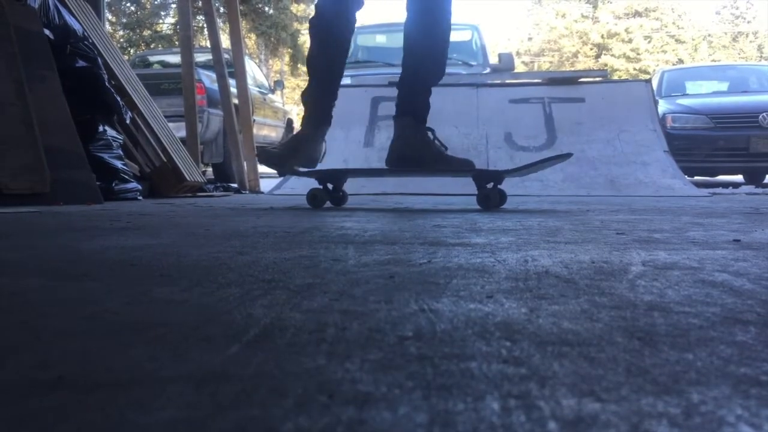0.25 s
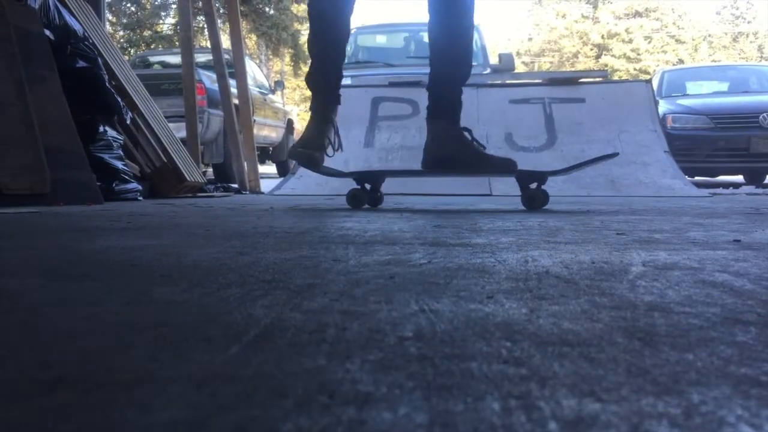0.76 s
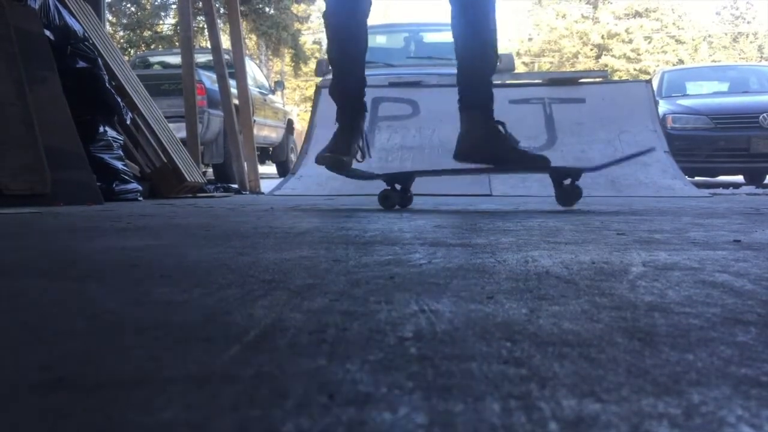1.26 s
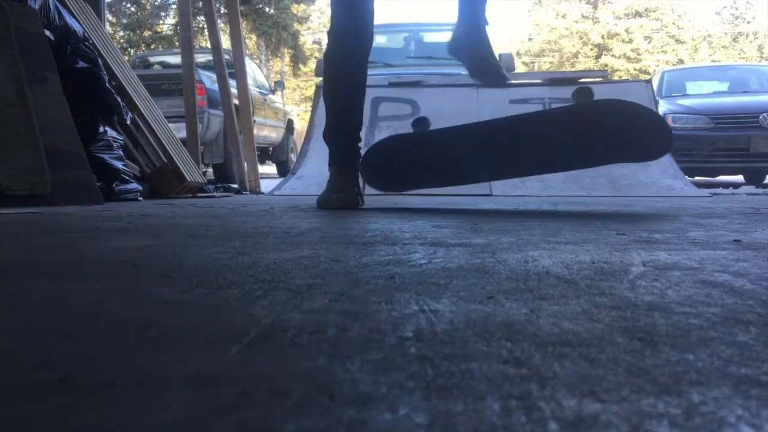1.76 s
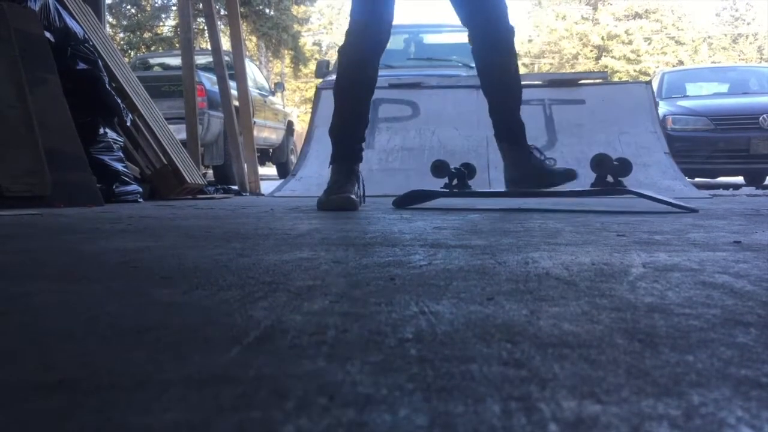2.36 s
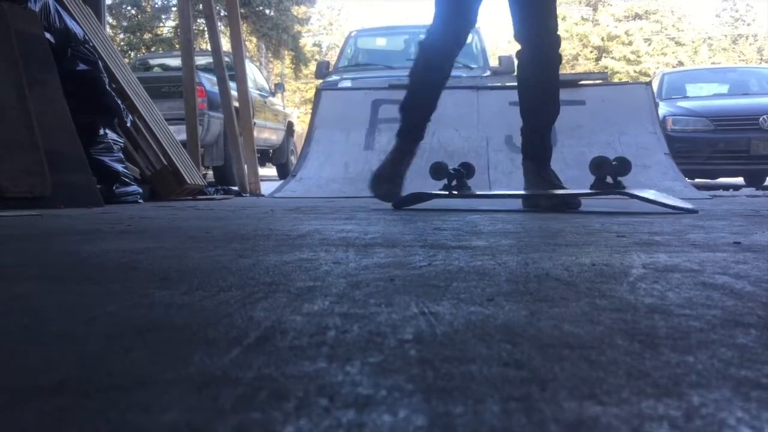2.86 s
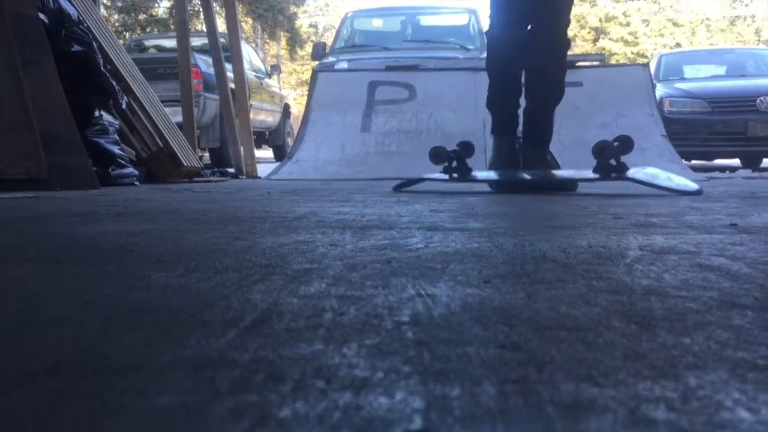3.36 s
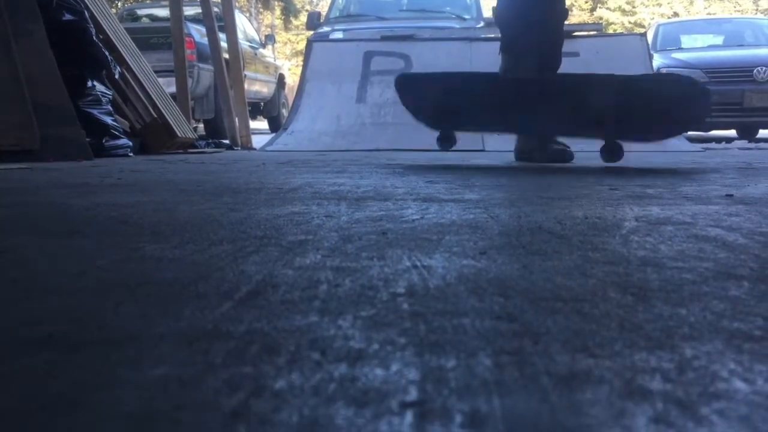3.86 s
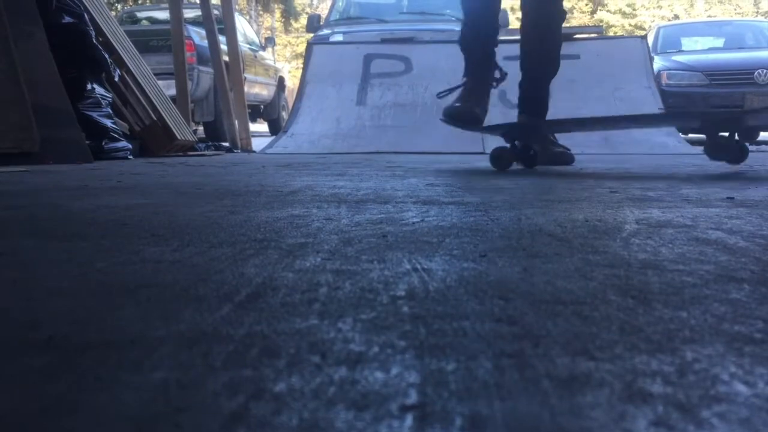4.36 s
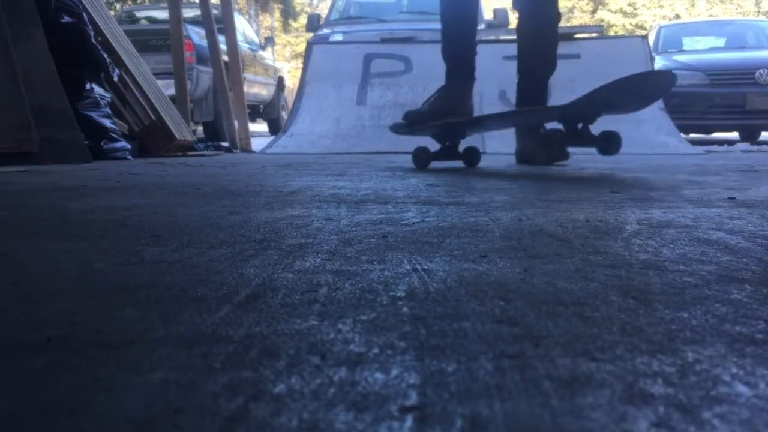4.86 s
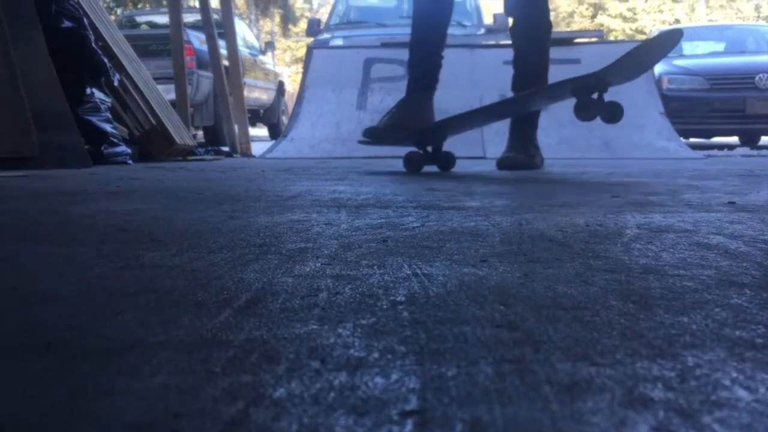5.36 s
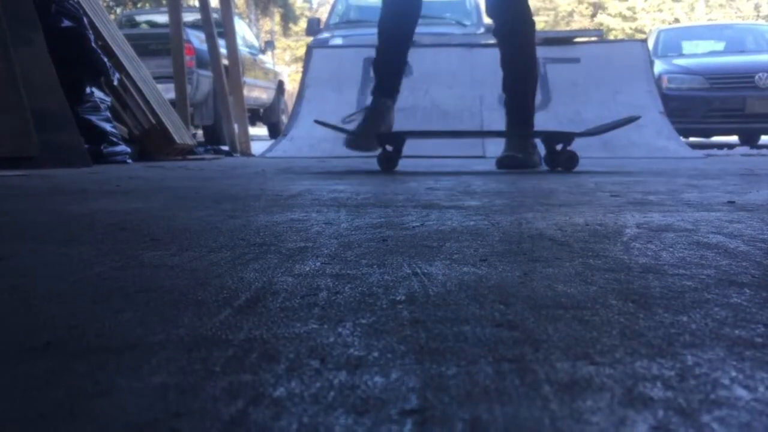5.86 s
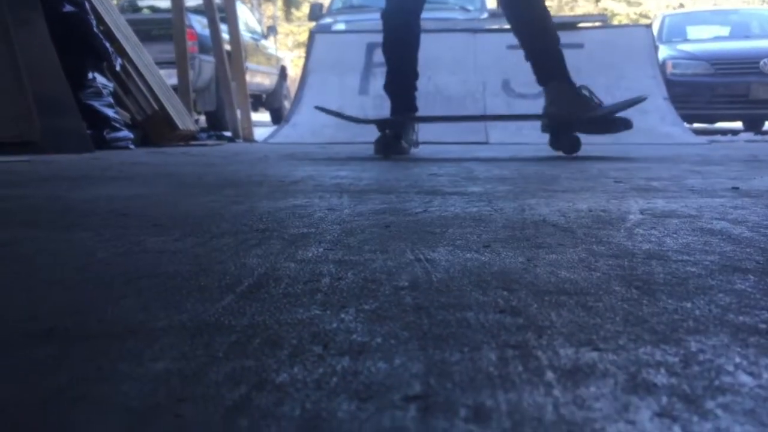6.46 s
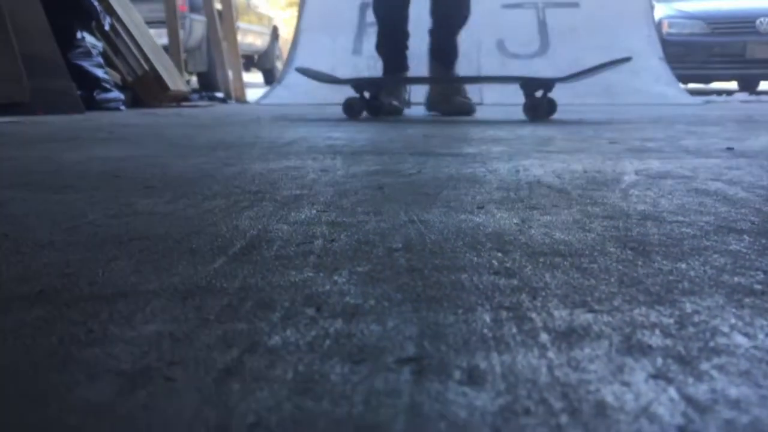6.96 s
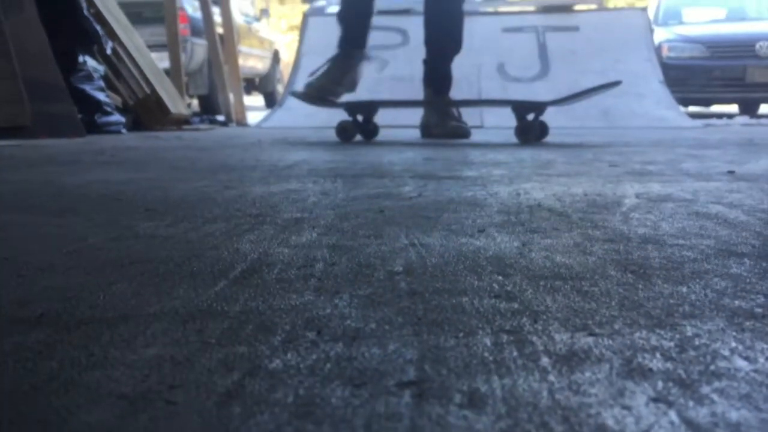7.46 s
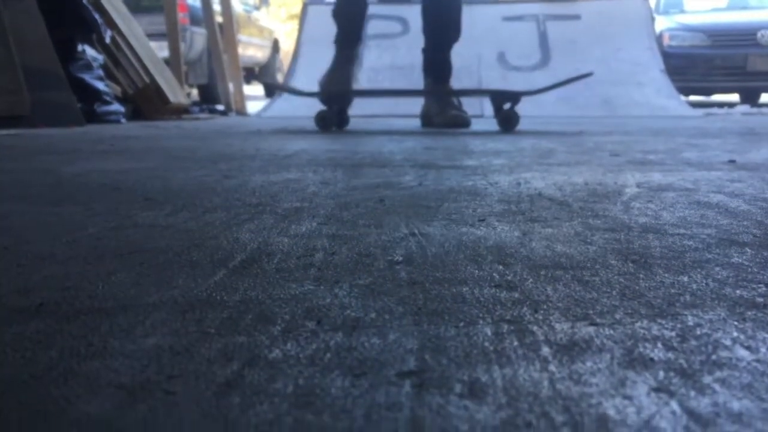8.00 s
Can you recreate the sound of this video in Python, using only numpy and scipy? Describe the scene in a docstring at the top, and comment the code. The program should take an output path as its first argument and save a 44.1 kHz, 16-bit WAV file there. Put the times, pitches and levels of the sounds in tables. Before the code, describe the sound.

Faint outdoor air and a low hum under a roofed concrete space. At 0.2 s a modest wooden knock, then barely audible shoe scuffs and tiny truck creaks. A sole scrapes from 1.3 s; at 1.45 s the skateboard tail snaps with a sharp, quick chatter. The board crashes down in very loud, dry clacks from 1.73 to 1.96 s, overloading the nearby microphone, with a short echo. Quiet follows, with a faint step at 2.6 s. Around 3.0-3.5 s shoes knock and scrape on grit; wooden bumps and a heavy scuff lead through 3.5-3.9 s to a loud triple wheel slam at 4.05 s. A softer bounce and brief roll come at 4.3 s, a dull drop at 4.74 s. Wheels clatter down at 5.75 s, a light step at 6.0 s, rolling and a firm bump at 6.5-6.8 s, a bright scuff at 7.0 s, then clicks at 7.6 s and a last knock at 7.8 s.

```python
"""On concrete under a roof, a skateboard is popped, falls on its back, is kicked over and pushed about.
Each blow is a short burst of gritty noise that rings the wooden deck, built from dying sine waves.
Shoes scuff and wheels roll as shaped noise with snags; the trucks creak as wavering tones.
The shelter answers with a short tail of echoes, over faint air noise and a hum.
The hardest clacks overload a microphone lying near the floor."""
import sys
import numpy as np
from scipy import signal
from scipy.fft import rfft, irfft
from scipy.io import wavfile
from scipy.ndimage import uniform_filter1d

SR = 44100
rng = np.random.default_rng(int(sys.argv[2]) if len(sys.argv) > 2 else 0)


def dump(signal):
    """Clip the signal to [-1, 1] and save it as 16-bit WAV at the path in sys.argv[1]."""
    limited = np.clip(np.atleast_2d(signal).T, -1, 1)
    pcm = np.round(limited * 32767).astype(np.int16)
    wavfile.write(sys.argv[1], SR, pcm)


N = 362943  # length in samples

# Ways the deck and its trucks bend and ring.
# Each row: pitch in Hz, relative level in dB, time to die by 60 dB in seconds (halved under rubbing).
DECK_MODES = [(146.6, -20.5, 0.12), (190, -11, 0.17), (300.6, -10, 0.11), (350.8, -13, 0.16),
              (393, -14.5, 0.093), (594, -20, .16), (616, -19.5, 0.18), (726.2, -20, 0.04),
              (883, -15, 0.065), (1073, -16, 0.29), (1483, -11, 0.033), (1832, -16.5, 0.057),
              (2240, -26.5, 0.21)]


def amp(db):
    """Turns decibels into a gain."""
    return 10 ** (np.asarray(db) / 20)


def unit(x):
    """Scales a sound to an energy of one."""
    return x / np.sqrt(np.sum(x ** 2) + 1e-20)


def read(points, hz):
    """Reads a curve of (Hz, value) points, joined on a log-frequency axis."""
    point_hz, value = np.transpose(points)
    return np.interp(np.log(hz + 1), np.log(point_hz + 1), value)


def add(mix, s, sound):
    """Mixes a sound in at s seconds, cutting off what runs past the end."""
    start = max(round(s * SR), 0)
    part = mix[start:][:len(sound)]
    part += sound[:len(part)]


def colour(x, points, size=2048):
    """Filters by a (Hz, dB) curve without smearing ahead in time, so that attacks stay sharp."""
    hz = abs(np.fft.fftfreq(size, 1 / SR))
    log_gain = np.log(amp(read(points, hz)))
    # minimum phase: the phase follows from the log gain
    spectrum = np.exp(np.conj(signal.hilbert(log_gain)))
    taps = np.fft.ifft(spectrum).real
    return signal.fftconvolve(x, taps[:size // 2])[:len(x)]


def contact_tone(thud_db, edge_db, fizz_db):
    """Gives the (Hz, dB) curve of a contact: soft heavy ones thud, hard gritty ones fizz."""
    low = [(25, thud_db - 37), (90, thud_db - 14.5), (170, thud_db - 8), (240, thud_db - 2.0), (310, thud_db)]
    middle = [(700, -0.54), (1150, -2.0), (1900, -0.7)]
    high = [(2700, edge_db * 0.61), (4500, edge_db), (8500, fizz_db + 1.5), (16000, fizz_db - 5.5)]
    return low + middle + high


def mode(t, hz, t60):
    """One vibration of unit energy that dies by 60 dB in t60 seconds."""
    return unit(np.sin(2 * np.pi * hz * t) * amp(-60 * t / t60))


def grit(t, rough_db):
    """Noise of many tiny collisions; a larger rough_db makes their sizes more uneven."""
    size = np.minimum(rng.exponential(1, len(t)), 4)
    return rng.standard_normal(len(t)) * amp(rough_db * size)


def background():
    """Faint outdoor air, as noise shaped by frequency, and an electrical hum, as a steady sine wave."""
    # Spectrum of the air. Each row: frequency in Hz, relative level in dB.
    air_spectrum = [(15, -53.5), (25, -38), (48, -6), (87, -10), (102, -7), (123, -2), (153, -16),
                    (285, -15), (439, -18.5), (2050, -27.5), (2220, -25), (2610, -27.5), (16000, -43)]
    air_db = -68.5
    hum_hz, hum_db = 120.4, -72.5
    gain = amp(read(air_spectrum, np.fft.rfftfreq(N, 1 / SR)))
    air = irfft(rfft(rng.standard_normal(N)) * gain, N)
    hum = np.sin(2 * np.pi * hum_hz * np.arange(N) / SR)
    return amp(air_db) * air / air.std() + amp(hum_db) * hum


def shelter(x, room_db, size=256):
    """Echoes from roof, ramp and walls: sparse taps that build up, then die band by band."""
    # How fast the echoes die. Each row: frequency in Hz, time to fall by 60 dB in seconds.
    decay_times = [(100, 0.32), (300, .35), (480, 0.32), (660, 0.38), (900, 0.33), (1300, 0.29),
                   (3500, 0.3), (7000, 0.26), (15000, 0.13)]
    # Tone of the echoes. Each row: frequency in Hz, relative level in dB.
    echo_tone = [(80, 3), (300, -0.5), (700, 3.5), (1500, -1.5), (4000, -5), (8000, -5), (15000, -4)]
    t = np.arange(SR * 3 // 5) / SR
    density = np.minimum(.03 + 2.5 * t, .3)
    taps = rng.choice([-1., 1.], len(t)) * (rng.random(len(t)) < density)
    taps *= np.clip((t - .003) / 0.0033, 0, 1)  # silent for the first 3 ms
    hz, at, bands = signal.stft(taps, SR, nperseg=size)
    fall_db = 60 * at / read(decay_times, hz)[:, None]
    bands = bands * amp(read(echo_tone, hz)[:, None] - fall_db)
    tail = signal.istft(bands, SR, nperseg=size)[1] / np.linalg.norm(taps * amp(-170 * t))
    response = amp(room_db) * tail
    response[0] += 1  # the direct sound
    return signal.fftconvolve(x, response)


def creak(length, hz, level_db):
    """Rubber sticking and slipping: a broken, wavering squeak."""
    t = np.arange(round(length * SR)) / SR
    waver = uniform_filter1d(rng.standard_normal(len(t)), size=60)
    grip = uniform_filter1d(rng.standard_normal(len(t)), size=500)
    pitch = hz * (1 + .07 * waver / waver.std())
    squeak = np.sin(2 * np.pi * np.cumsum(pitch) / SR)
    squeak *= abs(grip) / np.sqrt(np.mean(grip ** 2))
    fade = signal.windows.tukey(len(t), .5)
    return shelter(amp(level_db) * squeak * fade, room_db=-2)


def rub(length, level_db, tone_db, rough_db, judder_db, deck_db, attack, release, snags_per_s=70, snag_db=9):
    """A stroke over rough concrete: fine grains under uneven pressure, and snags that knock on the deck."""
    stroke = max(length, .005)
    t = np.arange(round((stroke + 0.089) * SR)) / SR
    judder = uniform_filter1d(rng.standard_normal(len(t)), size=130)
    pressure = (1 - np.exp(-t / attack)) * np.exp(-np.maximum(t - length, 0) / release)
    pressure *= amp(1.0 - 2.9 * np.minimum(t / stroke, 1))  # the stroke loses speed
    uneven_grit = grit(t, rough_db) * amp(judder_db * judder / judder.std())
    grains = pressure * unit(uneven_grit) * np.sqrt(len(t))
    snag_now = rng.random(len(t)) < snags_per_s / SR
    snags = pressure * amp(snag_db) * rng.standard_normal(len(t)) * snag_now
    deck = sum(amp(db) * mode(t, hz, t60 / 2) for hz, db, t60 in DECK_MODES)
    ringing = signal.fftconvolve(amp(deck_db) * grains + snags, deck)[:len(t)]
    rubbing = grains + 4 * snags + ringing
    return shelter(amp(level_db) * colour(rubbing, contact_tone(*tone_db)), room_db=-4)


def grind(length, level_db, thud_db=-3, edge_db=-5, fizz_db=4):
    """Grip tape on sand: separate grains crack, thin and bright."""
    return rub(length, level_db, (thud_db, edge_db, fizz_db), rough_db=9.0, judder_db=1.0, deck_db=-26,
               attack=.03, release=.01)


def roll(length, level_db, thud_db=2.0, edge_db=-14, fizz_db=-20):
    """Hard wheels rumble over coarse grains."""
    return rub(length, level_db, (thud_db, edge_db, fizz_db), rough_db=0.5, judder_db=0.5, deck_db=-24.5,
               attack=0.002, release=0.035)


def scrape(length, level_db, bright_db):
    """A flat sole rumbles and builds slowly; a grazing one hisses and bites at once."""
    rise_share = 0.14  # part of a stroke spent building up pressure, at neutral brightness
    tone_db = 0.0 - .8 * bright_db, bright_db - 7.5, .7 * bright_db - 19
    rise = max(rise_share * length * amp(-.8 * bright_db), .001)
    return rub(length, level_db, tone_db, rough_db=4.0, judder_db=1.0, deck_db=-19,
               attack=min(rise, .035), release=0.0064)


def blow(strength_db, thud_db, edge_db, fizz_db, contact, ring_hz, ring_db, room_db):
    """A few ms of chatter against the concrete; the deck rings on."""
    push_db = -40 - 2  # air shoved aside by the flat of the deck
    flex_hz, flex_db = 72, -40  # the whole board bouncing as one beam
    t = np.arange(SR // 4) / SR
    contact = max(contact, .001)  # seconds
    crush = grit(t, rough_db=5.5) * np.exp(-t / contact)
    # trucks and bolts rattle on for a moment, duller than the crushed grit
    rattle = colour(grit(t, rough_db=2.5), [(3000, 2), (12000, -5.0)])
    rattle = .13 * rattle * np.exp(-t / 0.047)
    # a long contact (a sole, a glancing wheel) also starts softly
    onset = 1 - np.exp(-t / (12 * contact ** 2))
    chatter = unit((crush + rattle) * onset)
    chatter[0] += 0.44 * np.exp(-contact / 0.0016)  # hard contacts open with a tick

    # where the board is hit decides how much each mode takes
    deck = np.zeros(len(t))
    for hz, db, t60 in DECK_MODES:
        side, share, bend = rng.standard_normal(3)
        deck += np.sign(side) * amp(db + 1.5 * share) * mode(t, hz * (1 + .012 * bend), t60)
    ring = unit(mode(t, ring_hz, .09) + .6 * mode(t, ring_hz * 1.055, .06))
    struck = chatter + amp(-11) * deck + amp(ring_db - 8.5) * ring
    wood = colour(struck, contact_tone(thud_db, edge_db, fizz_db))

    # hard blows flex the whole board and put a low thump under the clack
    u = t / 0.0026
    push = unit(u * (2 - u) * np.exp(-u))
    flex = mode(t, flex_hz * rng.uniform(.85, 1.15), .2)
    thump = amp(push_db) * push + amp(flex_db) * flex
    thump *= amp(0.26 * min(strength_db + thud_db - 29.0, 0))
    return shelter(amp(strength_db) * (wood + thump), room_db)


def tick(strength_db, bright_db, ring_hz):
    """Loose trucks and washers: a small, dry metal click with a clear pitch."""
    return blow(strength_db, thud_db=-9, edge_db=bright_db - 6.5, fizz_db=1.0 * bright_db - 18,
                contact=0.0028, ring_hz=ring_hz, ring_db=-3, room_db=-8)


def step(strength_db, weight_db, ring_db):
    """A shoe knocks softly; more weight behind it thuds deeper and crunches more grit."""
    # the ring pitch: a sole wakes the deck near its middle
    return blow(strength_db, weight_db, edge_db=0.79 * weight_db - 18.0, fizz_db=1.3 * weight_db - 28,
                contact=0.011, ring_hz=580, ring_db=ring_db, room_db=-0.55)


def landing(strength_db, thud_db, bright_db, ring_hz, ring_db, room_db):
    """The two wheels of an axle come down one just after the other and crush the dust under them."""
    first_contact = 0.0041  # seconds; the first wheel hits clean
    # the other one follows (lag in seconds) and settles more softly (contact in seconds)
    partner_lag, partner_db, partner_contact = 0.0048, -3.5, 0.0072
    out = np.zeros(SR)
    tone_db = (thud_db, bright_db - 12.0, 1.6 * bright_db - 15.5)
    first = blow(strength_db, *tone_db, first_contact, ring_hz, ring_db - 5, room_db)
    partner = blow(strength_db + partner_db, *tone_db, partner_contact, ring_hz, ring_db + 2.5, room_db)
    add(out, 0, first)
    add(out, partner_lag, partner)
    return out


def clack(strength_db, thud_db, bright_db, contact, ring_hz, ring_db, room_db):
    """Struck bare wood: a hard edge with little fizz."""
    return blow(strength_db, thud_db, bright_db - 7.0, bright_db - 22.5, contact, ring_hz, ring_db, room_db)


def pop(count=3):
    """The tail snaps against the floor and chatters: each rebound is weaker, after a longer gap."""
    strength_db, rebound_db = 22.5, -2  # first hit, and change per rebound
    gap, gap_growth = .0053, 1.25  # first gap in seconds, and its growth per rebound
    # each rebound lands a little further along the tail and rings a little higher
    ring_hz, ring_shift = 1452, 0.026
    out, s = np.zeros(SR), 0
    for k in range(count):
        thud_db = -2 if k else -22  # the first touch barely thuds
        hit = blow(strength_db + k * rebound_db, thud_db, edge_db=-3, fizz_db=-18, contact=0.0024,
                   ring_hz=ring_hz * (1 + ring_shift * k), ring_db=0, room_db=-8.5)
        add(out, s, hit)
        s += gap * gap_growth ** k
    return out


def scene():
    """Places board and shoes over the quiet background; every level in the tables is relative."""
    # Truck bushings under shifting weight.
    # Each row: start in seconds, length in seconds, pitch in Hz, level in dB.
    creaks = [(.73, .2, 4750, -74), (.905, .055, 2350, -65), (.978, .015, 1900, -63),
              (6.37, .11, 1750, -65), (4.935, .03, 3700, -69)]
    # Grip tape grinding sand while the board lies on its back.
    # Each row: start in seconds, length in seconds, level in dB.
    grinds = [(3.135, 0.068, -56.5), (3.436, .2, -55), (3.773, .12, -53), (3.93, .11, -49.5)]
    # Wheels running over the concrete. Each row: start in seconds, length in seconds, level in dB.
    rolls = [(4.332, 0.097, -32), (5.85, .21, -48.5), (6.507, 0.33, -38), (7.558, 0.092, -45.5)]
    # Soles rubbing on floor and deck.
    # Each row: start in seconds, length in seconds, level in dB, brightness in dB.
    scrapes = [(0.53, .11, -53.5, -4.5), (0.762, .07, -57, 1), (0.907, 0.085, -61, 3),
               (1.303, 0.08, -45, -3), (1.366, 0.19, -43, 0), (1.572, 0.037, -33.5, 4),
               (2.985, 0.063, -52, 4.5), (3.097, .1, -39.5, -1), (3.481, 0.04, -36, 7),
               (3.775, 0.096, -25, -11), (4.697, 0.035, -48.5, -7.5), (4.933, 0.047, -56, 4.5),
               (5.041, 0.021, -56.5, 10.5), (5.363, 0.17, -61.5, -25.5), (6.258, 0.059, -50.5, 7.5),
               (6.425, 0.21, -52.5, -2), (7.02, 0.06, -41.5, 13.5), (7.273, 0.12, -60.5, -3),
               (7.529, .04, -56, -3.5)]
    # Loose trucks and washers clicking.
    # Each row: start in seconds, strength in dB, brightness in dB, ring pitch in Hz.
    ticks = [(0.5622, -32, 1, 2060), (4.2576, -13, 0.5, 3800), (4.395, -3, 0, 630), (4.485, -19, 5, 1770),
             (6.1315, -30, 4, 3010), (6.5006, -8, 1.5, 1510), (7.6549, -7.5, -2, 2193),
             (7.689, -5.5, -8, 1680)]
    # Shoes treading on the floor and the deck.
    # Each row: start in seconds, strength in dB, weight in dB, deck ring in dB.
    steps = [(.63, -24.5, -3, -14), (2.566, -17, 7.5, -5), (2.975, -6.5, -5.5, -1.5),
             (3.142, -1.5, -0.5, -17), (3.149, -3.5, 5, 1), (3.207, -22, -2, 9.5), (3.432, -20.5, -2, 6),
             (3.479, -4, 2.5, -2.5), (3.762, -6, 5, -10), (6.0112, -8.5, 3, -14), (6.259, -23.5, 11.5, 2),
             (6.41, -35, 12, -12)]
    # An axle dropping or bouncing onto the floor. Each row: start in seconds, strength in dB,
    # thud in dB, brightness in dB, ring pitch in Hz, ring level in dB, room echo in dB.
    landings = [(4.0449, 19, -3.5, 1, 1660, -6, -13), (4.0573, 18.5, 4, 1, 438, -5.5, -7),
                (4.0702, 19, -2.5, 1, 595, 2, -5), (4.3148, 6.5, 4.5, 2.5, 621, -7, -.5),
                (4.366, -1, 1, 0, 615, -2, -1.5), (4.7395, -2.5, 6, 0.5, 2063, -7.5, -2),
                (5.7349, 9.5, -8.5, 3, 620, -4, -2), (5.775, 6, -8, 0, 1910, -10, -6.5),
                (5.7872, 1.5, -2, 0.5, 1760, -18, -1), (5.9222, -7, 0, 1, 648, 1.5, 2),
                (6.6899, 0, -7, 1, 570, -3, -1), (6.7377, 13, -2, 4, 1170, -8, 1.5),
                (6.791, -0.5, -5, 6.5, 953, 5.5, -9), (7.5557, -1, 3, -0.5, 567, -15, 4.5),
                (7.8017, 8, -0.5, 0.5, 1170, -6.5, -3)]
    # Hard knocks on the bare wood of the deck. Each row: start in seconds, strength in dB, thud in dB,
    # brightness in dB, contact time in seconds (1 ms at least is used), ring pitch in Hz,
    # ring level in dB, room echo in dB.
    clacks = [(0.2281, 4, 1, 2, .0058, 158, -1, -0.5), (1.73, 31.5, -1, 1.5, .0048, 988, -3, -7),
              (1.7987, 28, -6, -4, 0.0049, 1844, -8, -14.5), (1.877, 2.5, 3.5, 1.5, 0.0036, 342.3, 5, -6.5),
              (1.939, 28.5, -5.5, 1, 0.00089, 1430, -17, -10.5),
              (1.955, 25, -13.5, 1, .008, 1894, -11.5, 0.5), (3.547, 7, -3.5, -8.5, .005, 539, -12, 5.5),
              (3.593, 10.5, -7, -8.5, .0055, 571, -4.5, -5), (3.84, 6.5, 8.5, 0.5, .011, 426, -2.5, -10),
              (3.926, 17, 6.5, 1, 0.0023, 1593, -6.5, -9)]

    mix = background()
    for source, events in [(creak, creaks), (grind, grinds), (roll, rolls), (scrape, scrapes),
                           (tick, ticks), (step, steps), (landing, landings), (clack, clacks)]:
        for s, *settings in events:
            add(mix, s, source(*settings))
    add(mix, 1.4492, pop())
    return mix[None]


def record(dry, lopsided=0.014):
    """The microphone overloads, a little unevenly, on the hardest clacks; then both ends are cut."""
    ceiling = .5 * (1 + lopsided * np.sign(dry))
    clipped = dry / (1 + abs(dry / ceiling) ** 3) ** (1 / 3)
    low_cut = signal.butter(2, 28, "high", fs=SR, output="sos")  # Hz
    clipped = signal.sosfilt(low_cut, clipped)
    high_cut = signal.firwin(255, 16100, window=("kaiser", 8), fs=SR)  # Hz
    return signal.oaconvolve(clipped, high_cut[None], "same")


dry = scene()
out = record(dry)
dump(out)
```